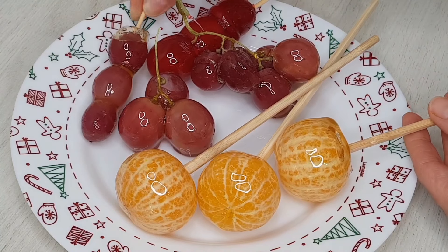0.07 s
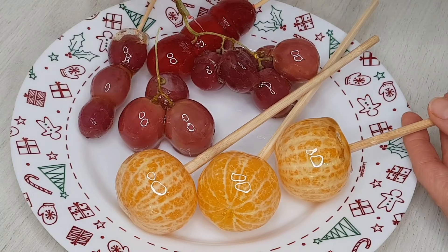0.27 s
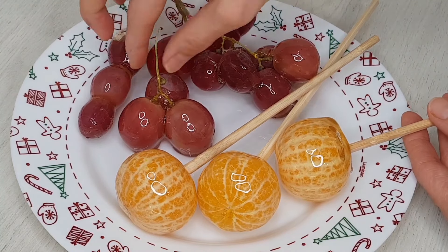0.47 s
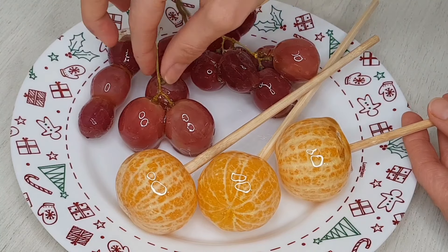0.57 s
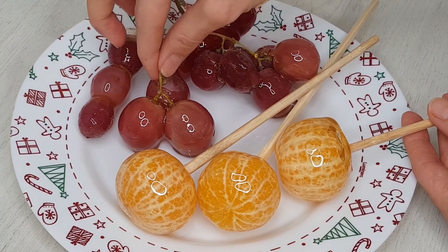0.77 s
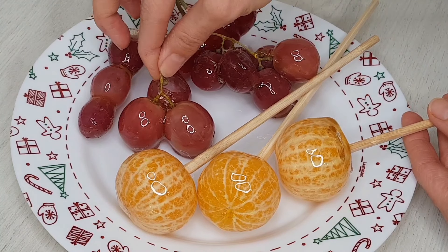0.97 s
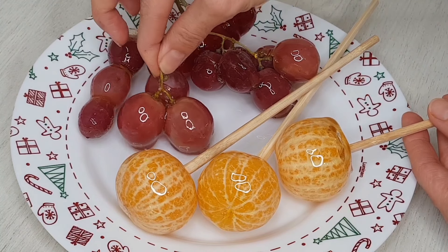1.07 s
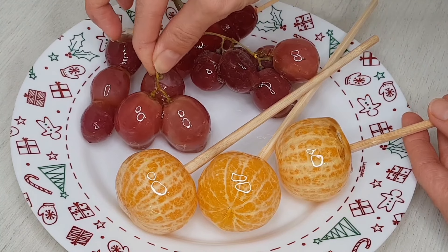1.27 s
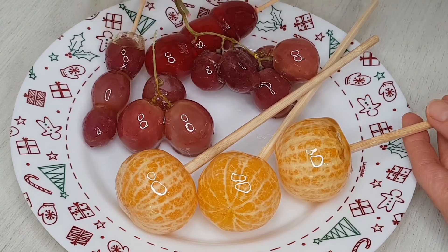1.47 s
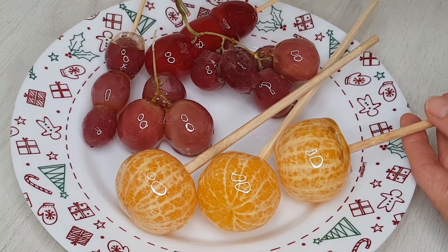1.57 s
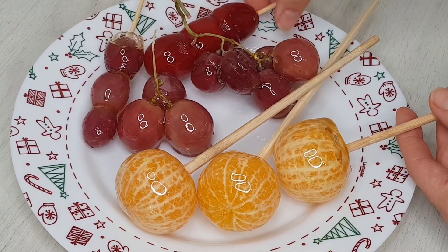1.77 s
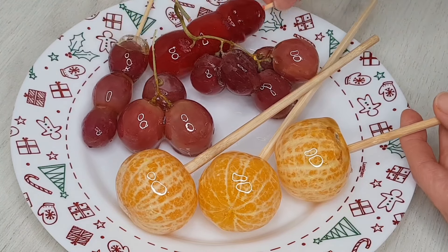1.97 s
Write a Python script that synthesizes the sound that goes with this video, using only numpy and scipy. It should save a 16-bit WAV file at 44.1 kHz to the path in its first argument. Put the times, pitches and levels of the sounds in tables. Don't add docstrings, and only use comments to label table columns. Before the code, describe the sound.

Candied fruit on skewers strikes a ceramic plate: faint clinks and a light scrape at 0.1-0.25 seconds, then a strong, short-ringing clatter near 0.37. Near quiet follows, with tiny ticks around 0.9. From 1.2 to 1.55 the hard shells knock hollowly, loudest at 1.26 and 1.35, with brief drags and soft table thuds. Close stereo pickup, short kitchen ring, faint hiss and low rumble.

```python
import sys
import numpy as np
from scipy import signal
from scipy.fft import rfft, irfft, next_fast_len
from scipy.io import wavfile
from scipy.ndimage import uniform_filter1d

SR = 44100
rng = np.random.default_rng(int(sys.argv[2]) if len(sys.argv) > 2 else 0)


def nominal_scale(level):
    x = np.asarray(level, float) / 20
    return 10 ** x


def log_audio(samples):
    frames = np.atleast_2d(samples).T
    limited = np.clip(frames, -1, 1)
    pcm = np.round(limited * 32767).astype(np.int16)
    wavfile.write(sys.argv[1], SR, pcm)


N = 88200


def evened(x):
    return x / np.sqrt(np.mean(x ** 2) + 1e-20)


def read(points, hz):
    f, value = np.transpose(points)
    return np.interp(np.log(hz + 1), np.log(f + 1), value)


def add(mix, s, sound):
    part = mix[round(s * SR):][:len(sound)]
    part += sound[:len(part)]


def shaped(x, gain):
    size = next_fast_len(x.shape[-1] + 4096)
    spectrum = rfft(x, size) * gain(np.fft.rfftfreq(size, 1 / SR))
    return irfft(spectrum, size)[..., :x.shape[-1]]


def clink_ring():
    plate_hz = [541, 733, 1063, 1254, 1489, 1815, 2040, 3191, 4030, 4455, 5190, 6164, 7445, 8904]
    # (level [dB], t60 [s])
    plate_decay = [(-11.5, 0.098), (-11.5, 0.11), (-8.5, .1), (-3.5, 0.05), (-3.5, 0.051), (4.5, 0.024),
                   (-2.5, .09), (-13.5, 0.12), (-10.5, 0.04), (-7, 0.024), (-11.5, 0.05), (-3, 0.02),
                   (-8, 0.03), (-9.5, 0.13)]
    # (pitch [Hz], level [dB], t60 [s])
    shell_modes = [(584.2, -16, 0.061), (2654, -22, .06), (3840, -15.5, 0.047), (4950, -13.5, 0.048),
                   (9900, -23.5, .035), (10340, -14, .045), (11130, -20, .03), (11600, -23.5, 0.031),
                   (13300, -19.5, .035), (13880, -21.5, 0.038)]
    spread_db, rise_s = 2.5, 0.00091
    modes = [(hz, *decay) for hz, decay in zip(plate_hz, plate_decay)] + shell_modes
    hz, db, t60 = np.transpose(modes)[:, :, None]
    t = np.arange(SR // 2) / SR
    uneven_db = spread_db * rng.standard_normal((len(modes), 1))
    waves = nominal_scale(db + uneven_db - 60 * t / t60) * np.sin(2 * np.pi * hz * t)
    return waves.sum(0) * (1 - np.exp(-t / rise_s)) / 2


def clinks():
    # (time [s], ring [dB], crack [dB], contact [ms])
    clink_events = [(0.127, -40.5, -44.5, 0.6), (.135, -40.5, -42.5, 0.8), (0.165, -35.5, -52.5, 1),
                    (0.2156, -38, -27.5, 0.051), (.222, -43.5, -31, 0.14), (.249, -42, -43, .1),
                    (.360, -28.5, -62.5, 0.37), (.370, -15, -20.5, 0.23), (.377, -21, -30, 0.21),
                    (.3825, -24.5, -22, 0.18), (.394, -18, -38, 0.49), (1.230, -37, -35.5, 0.23),
                    (1.235, -54, -49.5, 0.28), (1.2655, -44, -43.5, .04), (1.2849, -31.5, -42.5, 0.0653),
                    (1.2963, -26.5, -24, 0.32), (1.302, -22.5, -32.5, 1), (1.3461, -46, -38.5, .04),
                    (1.444, -34, -45.5, 0.1), (1.4537, -46, -28.5, 0.083), (1.460, -53, -63, 0.22),
                    (1.5213, -41.5, -35, .5), (1.528, -32.5, -40.5, 0.44)]
    # (frequency [Hz], level [dB])
    crack_colour = [(88, -18), (150, 3.5), (2360, -4.5), (4480, -13), (6230, -22), (8010, -58.5),
                    (8660, -23.5), (13000, -24.5), (15500, -81.5)]
    crack_t60, thin_hz_ms = 0.028, 60
    out = np.zeros(N)
    t = np.arange(2048) / SR
    for s, ring_db, crack_db, contact_ms in clink_events:
        def soften(hz):
            return 1 / (1 + 1j * hz * contact_ms / 1000) ** 2

        def crack_gain(hz):
            return nominal_scale(read(crack_colour, hz)) * hz / (hz + thin_hz_ms / contact_ms)

        ringing = shaped(clink_ring(), soften)
        ringing[0] = 0
        crack = evened(shaped(rng.standard_normal(len(t)), crack_gain)) * nominal_scale(-60 * t / crack_t60) / 2
        add(out, s, nominal_scale(ring_db) * ringing)
        add(out, s, nominal_scale(crack_db) * crack)
    return out


def knocks():
    # (time [s], peak [dB], pitch [Hz], width [Hz], overtones [0-1])
    knock_events = [(.2156, -44.5, 3280, 79, 0.1), (.2156, -50.5, 2060, 23, 0),
                    (0.219, -60.5, 2654, 34, 0.2), (0.372, -29.5, 1184, 82, 0.1),
                    (.372, -36.5, 4330, 47, 0), (.373, -43, 729, 22, 0), (0.381, -33, 3222, 62, 0.1),
                    (.385, -38.5, 1058, 26, 0), (.652, -50, 1763, 220, 0.38), (1.114, -53, 1870, 86, 0.05),
                    (1.1135, -57, 1330, 190, 0.1), (1.264, -17, 1980, 336, 1), (1.2703, -24, 1933, 320, .2),
                    (1.2955, -39, 4340, 100, 0.1), (1.2969, -34, 3250, 150, 0.3),
                    (1.297, -31.5, 1650, 120, .2), (1.3463, -9.5, 1987, 358, 1),
                    (1.3498, -14.5, 1950, 280, 0.5), (1.4523, -33, 1650, 110, 0),
                    (1.4525, -37.5, 5060, 270, 0), (1.456, -42, 3670, 62, 0.1), (1.46, -33, 1670, 250, 0),
                    (1.5203, -23, 1960, 180, 0.3), (1.5212, -53, 4830, 63, 0), (1.5215, -38, 3750, 290, 0),
                    (1.5252, -25, 1903, 125, 0.15), (1.5249, -30.5, 1200, 64, 0.1),
                    (1.53, -47, 971, 16.6, 0), (1.53, -48, 543.5, 15, 0.01)]
    swell_s, upper, top = 0.0011, 0.22, 0.035
    out = np.zeros(N)
    t = np.arange(8192) / SR
    rise = np.sin(np.pi / 2 * np.minimum(t / swell_s, 1)) ** 2
    for s, db, hz, width, over in knock_events:
        decay = np.exp(-np.pi * width * t)
        body = decay * np.sin(2 * np.pi * hz * t)
        body += over * upper * decay ** 2 * np.sin(2 * np.pi * 1.8 * hz * t)
        body += over * top * decay * np.sin(2 * np.pi * 2.9 * hz * t)
        add(out, s, nominal_scale(db) * 2 * rise * body)
    return out


def scrapes():
    # (start [s], length [s], level [dB])
    drags = [
        (0.124, 0.13, -54.5),
        (1.114, 0.071, -70.5),
        (1.225, 0.042, -57),
        (1.275, 0.046, -41.5),
        (1.354, 0.11, -58),
        (1.468, 0.053, -54),
        (1.528, 0.07, -49.5),
    ]
    # (frequency [Hz], level [dB])
    drag_colour = [(88, -47), (150, -1.5), (844, -12.5), (1800, -1.5), (5870, -44.5), (6600, -52),
                   (7130, -30.5), (15500, -33.5)]
    grains_per_s = 1700
    t = np.arange(N) / SR
    caught = rng.random(N) < grains_per_s / SR
    size = nominal_scale(5 * np.minimum(rng.exponential(1, N), 3))
    grains = caught * size * rng.choice([-1., 1.], N)
    friction = evened(grains) + 0.17 * rng.standard_normal(N)
    rub = evened(shaped(friction, lambda hz: nominal_scale(read(drag_colour, hz))))
    pressure = np.zeros(N)
    for s, length, db in drags:
        pressure += nominal_scale(db) * np.sin(np.pi * np.clip((t - s) / length, 0, 1)) ** 0.16
    return rub * pressure


def ticks():
    # (time [s], peak [dB], pitch [Hz], width [Hz], length [s])
    tick_events = [(.002, -71.5, 2070, 49.6, .04), (.002, -72, 1380, 81, .03),
                   (0.1276, -50.5, 3250, 300, .02), (0.1279, -63, 5200, 397, .015),
                   (.128, -56, 11600, 2550, .008), (0.214, -46, 11420, 2996, .003),
                   (0.376, -39.5, 11500, 2193, .006), (0.387, -43, 12430, 1300, 0.0058),
                   (.8563, -39, 12300, 2300, .0002), (.8563, -56, 5800, 1000, .0004),
                   (0.931, -54.5, 11500, 1500, .0006), (1.115, -60.5, 1700, 400, .06),
                   (1.117, -52, 11200, 2500, 0.0052), (1.221, -41, 11130, 1500, 0.006),
                   (1.2212, -57, 4970, 2510, 0.0041), (1.263, -45.5, 10540, 1500, 0.0057),
                   (1.28, -50, 12000, 2520, .006), (1.293, -46, 10410, 80.5, 0.0089),
                   (1.347, -41, 10500, 1800, .005), (1.348, -48.5, 8810, 150, .006),
                   (1.555, -39, 1900, 60, .04), (1.609, -50, 1850, 252, .06),
                   (1.891, -75.5, 4910, 90, 0.077)]
    out = np.zeros(N)
    t = np.arange(-64, 6000) / SR
    for s, db, hz, width, length in tick_events:
        burst = rng.standard_normal(len(t)) * (t >= 0) * np.exp(-t / length)
        snap = shaped(burst, lambda f: 1 / (1 + ((f - hz) / width) ** 4))
        add(out, s + t[0], nominal_scale(db) * snap / np.abs(snap).max())
    return out


def thuds():
    # (time [s], peak [dB], pitch [Hz], t60 [s])
    thud_events = [(0.132, -54, 127, .4), (0.163, -47.5, 60, .2), (0.214, -39, 192, 0.1),
                   (.24, -52.5, 124, .3), (.3, -55.5, 62, 0.24), (.37, -39, 177, 0.2),
                   (0.373, -42, 130, 0.36), (0.374, -43, 45.8, 0.13), (.42, -46.5, 247, 0.35),
                   (.43, -49, 328.6, 0.24), (0.518, -48, 83, .2), (.65, -55, 195, 0.066),
                   (0.656, -46, 55.2, 0.18), (1.262, -51, 130, .2), (1.29, -41.5, 150, 0.23),
                   (1.291, -41.5, 422, 0.047), (1.33, -44, 60, .2), (1.36, -50, 296, 0.19),
                   (1.41, -52, 95, .2), (1.461, -36.5, 127, 0.22), (1.52, -36.5, 207, 0.21),
                   (1.528, -42.5, 133, .6), (1.53, -51.5, 50, 0.24), (1.63, -55.5, 132.9, .4),
                   (1.64, -54.5, 58.7, 0.23)]
    longest_s = 0.42
    out = np.zeros(N)
    t = np.arange(SR // 2) / SR
    for s, db, hz, t60 in thud_events:
        envelope = nominal_scale(db - 60 * t / min(t60, longest_s)) * (1 - np.exp(-t * hz * 3.1))
        add(out, s, envelope * np.sin(2 * np.pi * hz * t))
    return out


def room(x):
    # (frequency [Hz], t60 [s])
    room_decay = [(100, 0.62), (400, 0.42), (1000, 0.38), (2000, 0.4), (4000, 0.43), (7000, 0.33),
                  (14000, 0.59)]
    build_s = 0.012
    taps = np.zeros((2, SR))
    at = np.arange(160, SR - 20, 20)
    at = at + rng.integers(0, 20, (2, len(at)))
    np.put_along_axis(taps, at, rng.choice([-1., 1.], at.shape), 1)
    hz, t, z = signal.stft(taps, SR, nperseg=256)
    build = 1 - 0.23 * np.exp(-t / build_s)
    decay = nominal_scale(-60 * t / read(room_decay, hz)[:, None])
    tail = signal.istft(z * build * decay, SR, nperseg=256)[1]
    return signal.fftconvolve(x[None], tail / np.linalg.norm(tail[0]), axes=1)[:, :N]


def hiss():
    # (frequency [Hz], level [dB])
    hiss_colour = [(59, -34.5), (100, -2.5), (160, -4), (234, -13.5), (2420, -22), (4870, -23), (7940, -27),
                   (12400, -14.5), (16000, -14.5)]
    # (frequency [Hz], likeness [0-1])
    hiss_same = [(60, 0.75), (240, 0.67), (950, 0.06), (3770, 0.087), (15000, 0.25)]
    # (frequency [Hz], left over right [dB])
    hiss_lean = [(60, 0.5), (240, -2.5), (950, 1.5), (3770, -3), (15000, 4.5)]
    hiss_db, patchy_db = -65.5, 1.5
    rumble_db, rumble_hz, rumble_width_hz = -73.5, 48, 13
    left, other, low = rng.standard_normal((3, N))
    right = shaped(left, lambda hz: read(hiss_same, hz))
    right += shaped(other, lambda hz: np.sqrt(1 - read(hiss_same, hz) ** 2))
    pair = []
    for noise, side in ((left, 1), (right, -1)):
        pair.append(shaped(noise, lambda hz: nominal_scale(read(hiss_colour, hz) + side * read(hiss_lean, hz) / 2)))
    z = signal.stft(np.array(pair), nperseg=512)[2]
    patches = uniform_filter1d(rng.standard_normal(z.shape[1:]), 8, 0)
    patches = evened(uniform_filter1d(patches, 5, 1))
    fizz = signal.istft(z * nominal_scale(patchy_db * patches), nperseg=512)[1][:, :N]
    lows = np.array([low + 0.35 * left, low + 0.36 * other])
    rumble = shaped(lows, lambda hz: np.exp(-((hz - rumble_hz) / rumble_width_hz) ** 2))
    return nominal_scale(hiss_db) * evened(fizz) + nominal_scale(rumble_db) * evened(rumble)


def scene():
    # (frequency [Hz], left ahead of right [rad])
    port_lead = [(0, 5.5), (200, -1.06), (700, 1.92), (1500, 1.65), (3000, 0.37), (6000, 0.5), (9000, 1),
                 (16000, 0.9)]
    # (frequency [Hz], left over right [dB])
    port_lean = [(60, 1), (150, -0.5), (380, -3), (950, -7.5), (2380, -4.5), (5980, -22), (8800, -9),
                 (15000, -10)]
    plate = clinks() + scrapes()
    shells, table, glaze = knocks(), thuds(), ticks()
    direct = plate + shells + table + glaze
    near = [shaped(direct, lambda hz: np.exp(0.5j * side * read(port_lead, hz))) for side in (1, -1)]
    to_room = nominal_scale(-0.5) * plate + nominal_scale(-8.5) * shells + nominal_scale(-7) * table + nominal_scale(-13) * glaze
    left, right = near + room(to_room)
    left = shaped(left, lambda hz: nominal_scale(read(port_lean, hz) / 2))
    right = shaped(right, lambda hz: nominal_scale(-read(port_lean, hz) / 2))
    return hiss() + np.array([left, right])


def band_limit(x):
    return signal.sosfilt(signal.butter(12, 16450, fs=SR, output="sos"), x)


def record(dry):
    notch_hz, notch_width_hz, notch_db = 7956, 303, -9
    edge_hz = 15750

    def port(hz):
        notch = notch_db * np.exp(-((hz - notch_hz) / notch_width_hz) ** 2)
        edge = -26 * np.clip((hz - edge_hz) / 300 + 1, 0, 2)
        return nominal_scale(notch + edge)

    return band_limit(shaped(dry, port))


dry = scene()
out = record(dry)
log_audio(out)
```